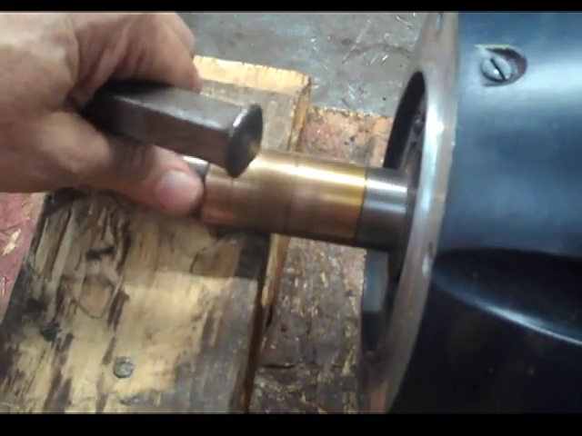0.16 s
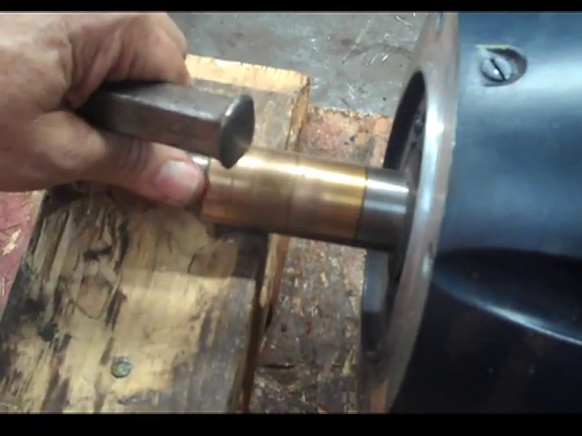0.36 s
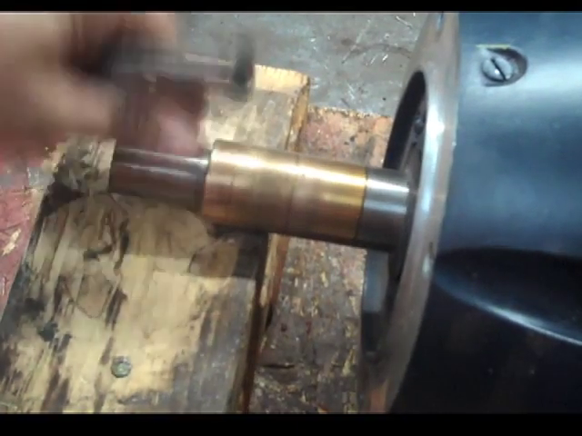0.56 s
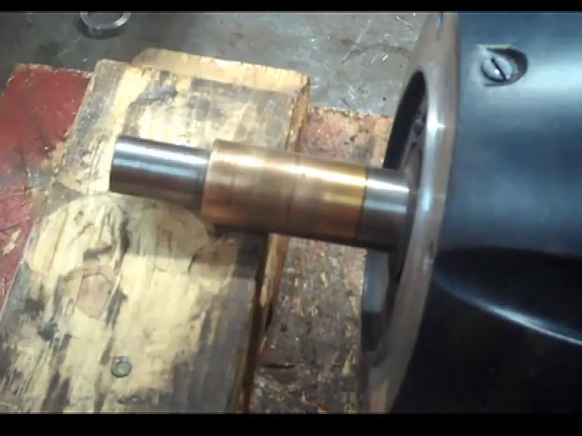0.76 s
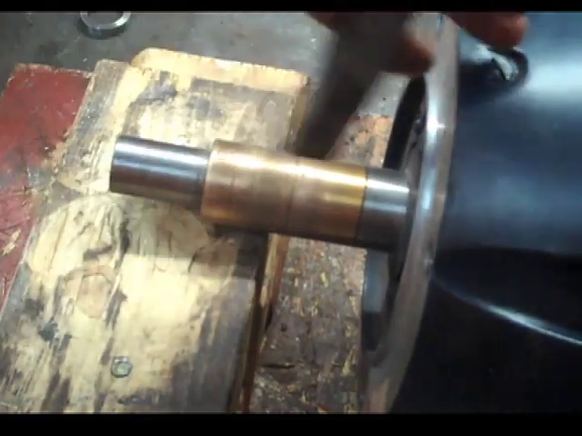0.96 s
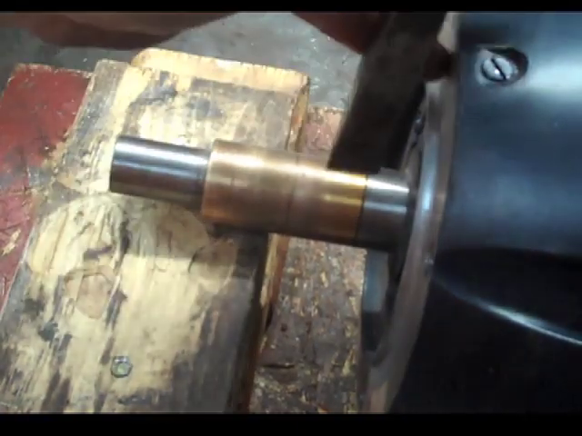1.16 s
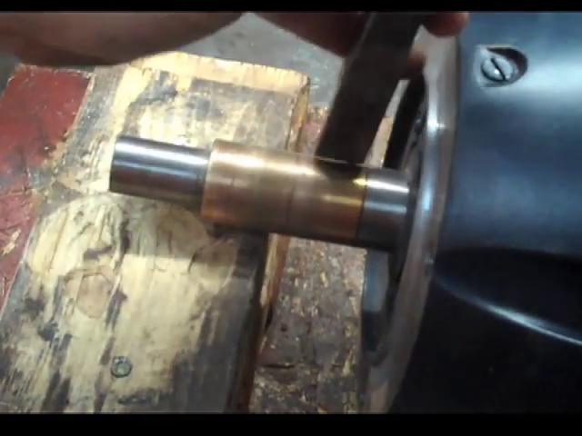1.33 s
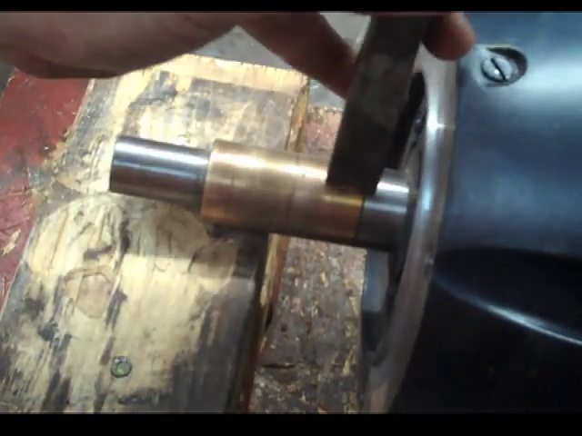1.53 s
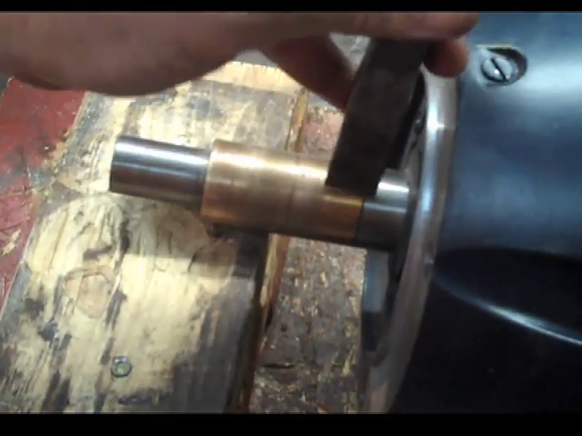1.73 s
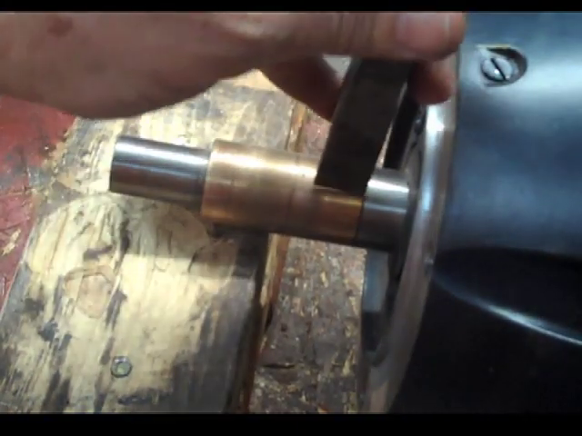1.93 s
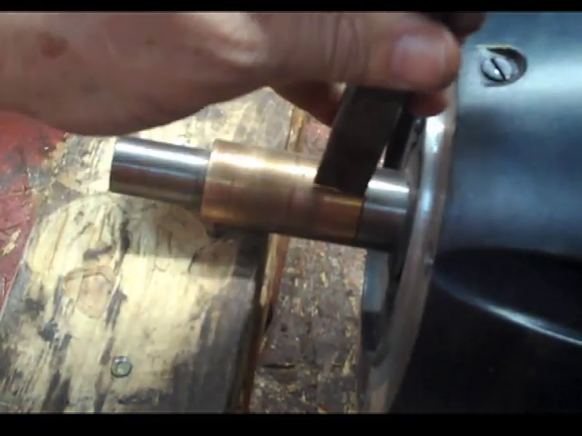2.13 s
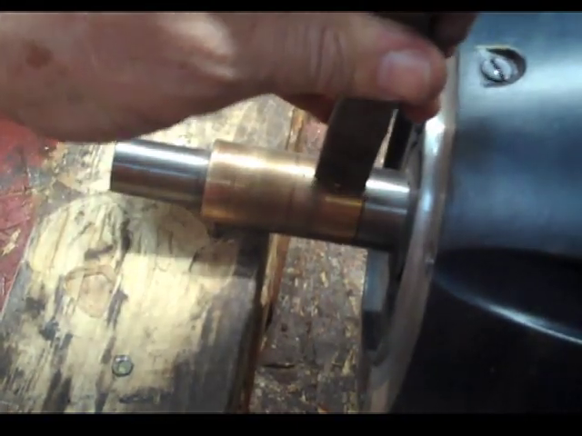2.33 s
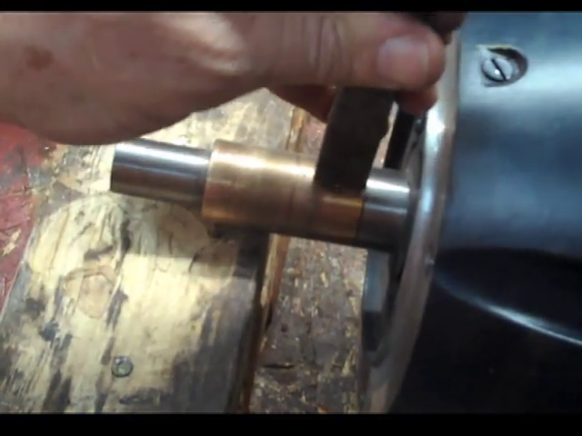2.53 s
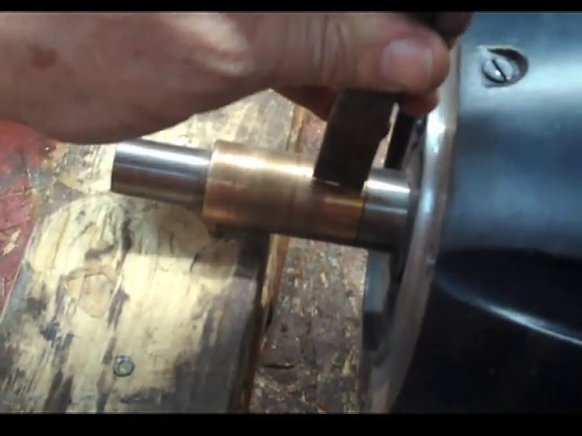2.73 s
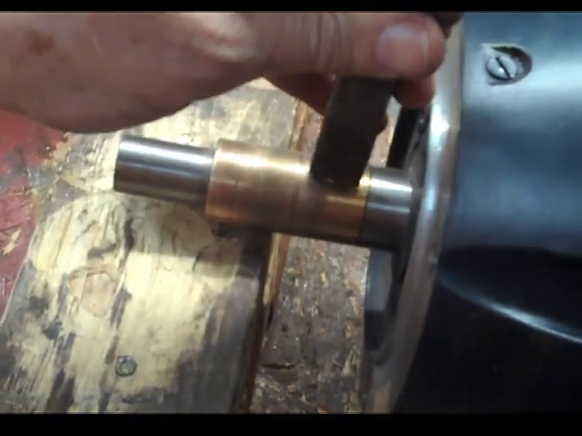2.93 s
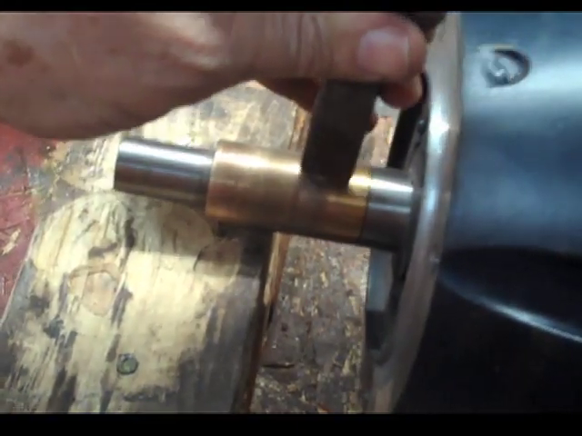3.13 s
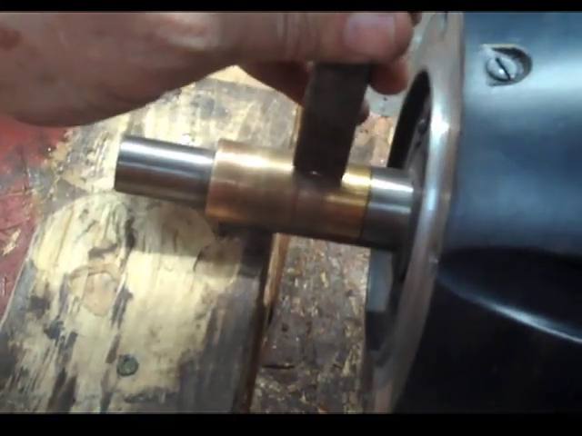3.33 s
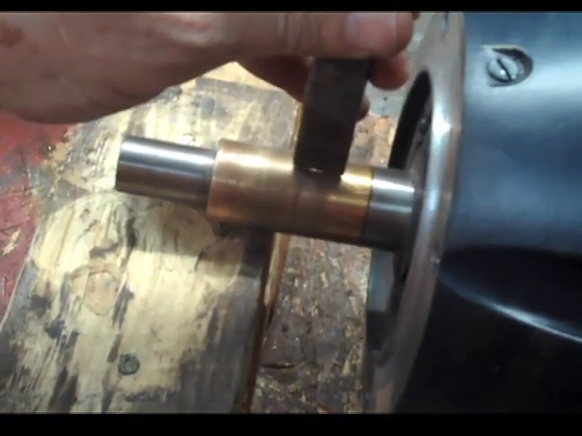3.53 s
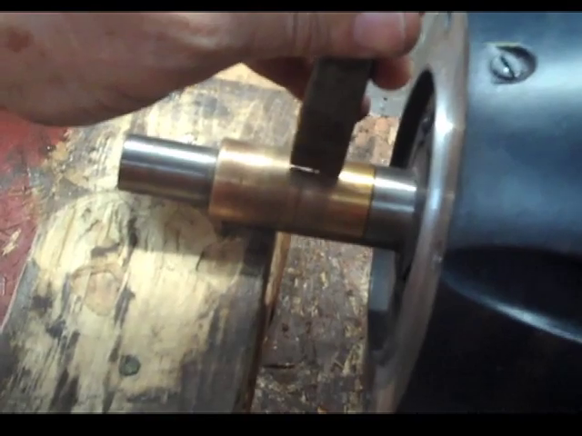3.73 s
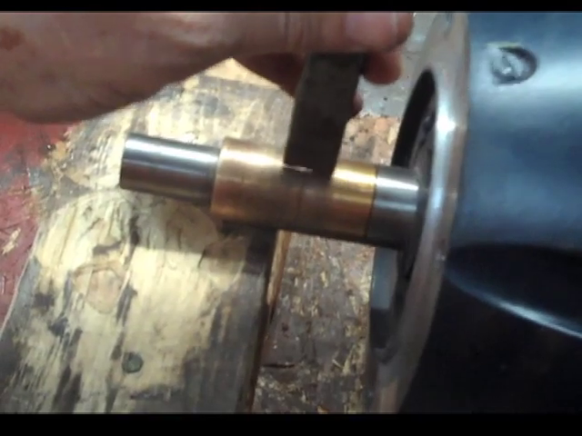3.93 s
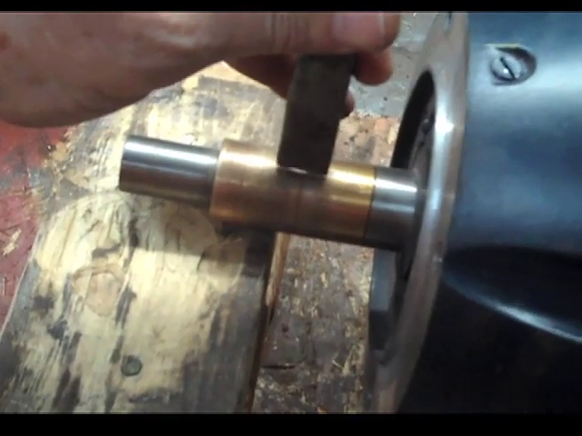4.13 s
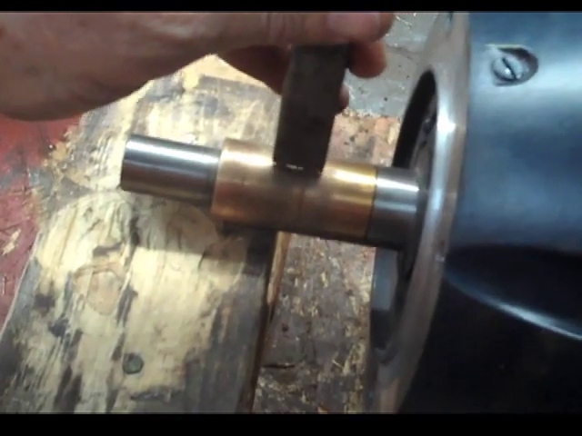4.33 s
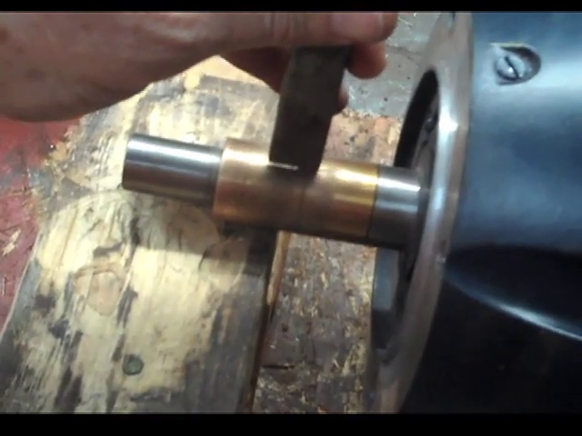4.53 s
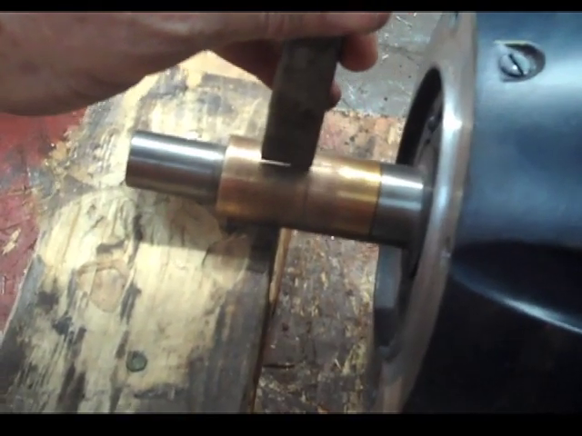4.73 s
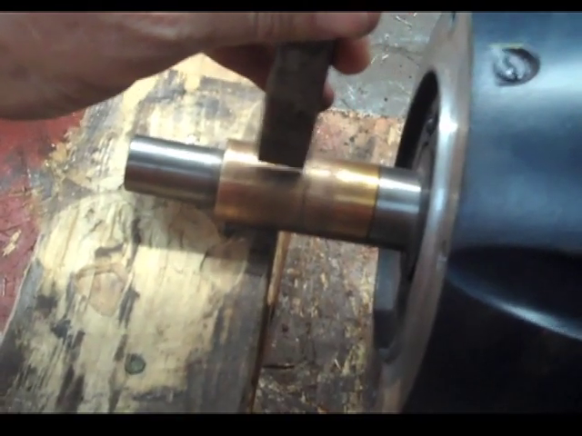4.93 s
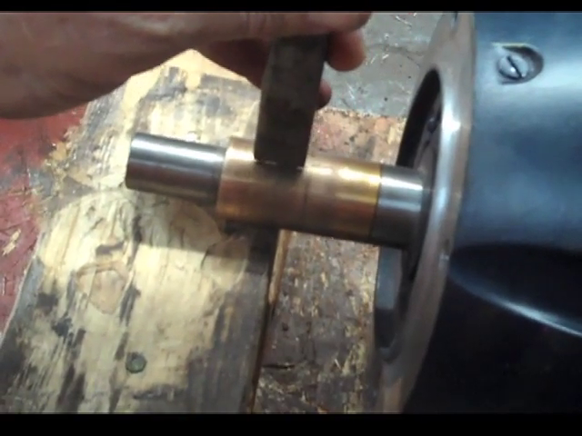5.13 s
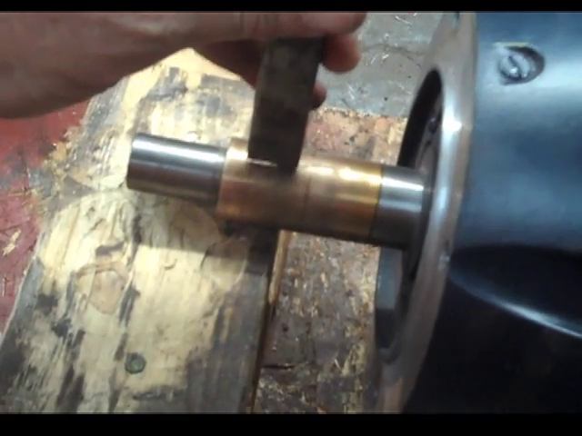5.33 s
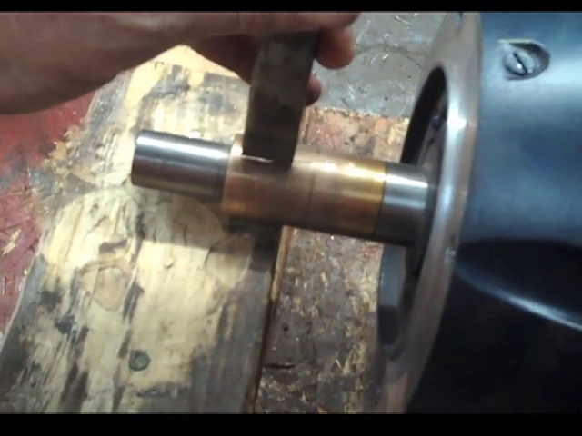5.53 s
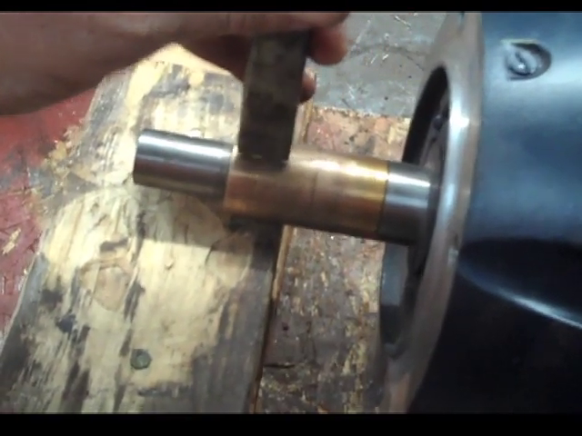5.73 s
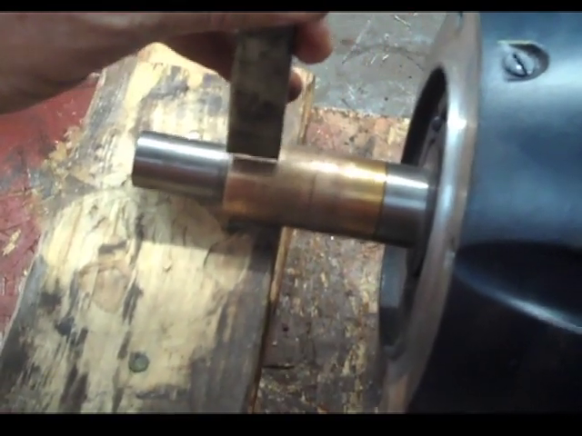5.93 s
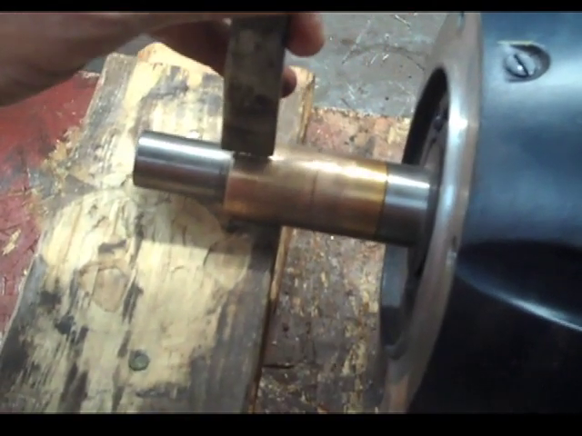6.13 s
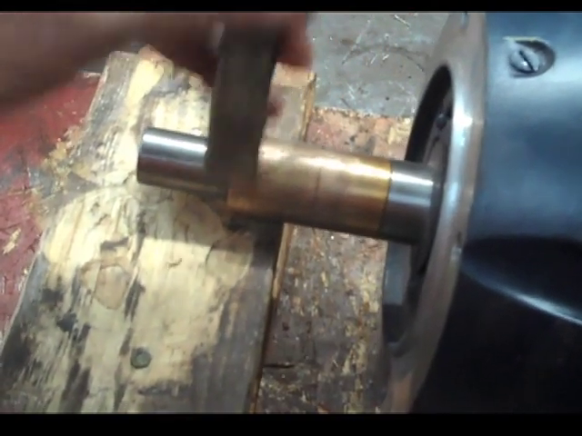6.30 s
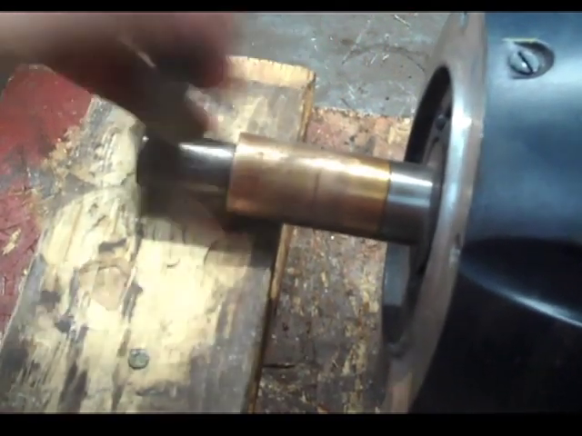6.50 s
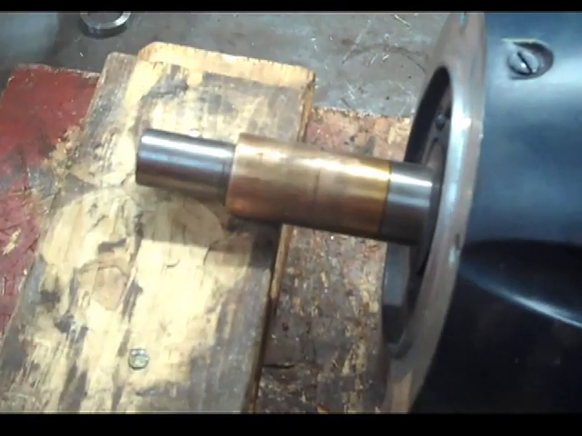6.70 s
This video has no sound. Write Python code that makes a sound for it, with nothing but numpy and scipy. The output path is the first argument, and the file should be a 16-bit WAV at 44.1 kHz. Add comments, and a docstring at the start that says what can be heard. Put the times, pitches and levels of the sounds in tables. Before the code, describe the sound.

Over a low, steady rush of workshop air, fingers brush metal and tiny steel ticks sound. A chisel edge briefly skids and sings, then knocks lightly on a brass sleeve. From two seconds, hard bright clanks follow about four per second, each with crackle, thump and short metallic ringing. The close microphone overloads, while a large hall adds a long wash. A soft lift-off touch ends the run.

```python
"""First come soft brushing and tiny steel ticks over a steady, low rush of air: a hand is placing a chisel.
The chisel skids, touches a brass sleeve on a motor shaft, then is hammered along it about four times a second.
Each blow mixes shaped noise (clash, overload crackle and thump) with fading tones (chisel, edge, housing,
shaft, bench). The housing rings less as the chisel moves away from the motor. A large workshop hall answers
with a long wash of fading noise, and the microphone input flattens the loudest peaks."""
import sys
import numpy as np
from scipy import signal
from scipy.fft import rfft, irfft
from scipy.io import wavfile

SR = 44100
rng = np.random.default_rng(int(sys.argv[2]) if len(sys.argv) > 2 else 0)


def wav_out(sig):
    """Save sig, one row per channel (or a flat mono array), as 16-bit PCM at SR to the path in sys.argv[1]."""
    wavfile.write(sys.argv[1], SR, np.round(np.clip(np.atleast_2d(sig).T, -1, 1) * 32767).astype(np.int16))


N = 302526
AGE = np.arange(SR) / SR  # seconds since a sound began; each single sound is cut off after one second

# Levels are relative unless stated; t60 is the time a sound takes to fade by 60 dB.
# hammer blows: t/s, strength level/dB, chisel ring level/dB, chisel pitch f/Hz
BLOWS = [(2.004, -3.5, -9, 6654), (2.318, 3, -6, 6520), (2.5891, 1.5, -7, 6540), (2.8576, 0.5, -21, 6350),
         (3.1151, -1, -10.5, 6460), (3.3681, -1.5, -11, 6686), (3.637, -.5, -8.5, 6534),
         (3.901, -.5, -6, 6475), (4.156, -1.5, -8, 6570), (4.415, -1.5, -9.5, 6490),
         (4.677, -1.5, -3.5, 6526), (4.9324, -2, -11, 6465), (5.205, -0.5, -24, 6530),
         (5.461, -2.5, -5.5, 6564), (5.7247, -1.5, -11, 6530), (5.9882, -4, -4, 6480),
         (6.2531, -3.5, -7.5, 6510)]
# the chisel is set down, bounces, is lifted off: t/s, clash level/dB, housing level/dB, tilt/(dB per octave)
TOUCHES = [(1.3156, -26, -30, -3.5), (1.5294, -12.5, -10.5, -5), (1.586, -47, -45, -8),
           (1.7365, -52, -32, -15), (6.421, -34, -42.5, -15)]
# the chisel's way along the sleeve: t/s, place (0 motor end, 1 free end)
TRAVEL = [(2.5, 0.023), (3.4, 0.17), (4.4, 0.63), (6.0, 0.71), (6.25, 0.75)]
# housing ring and thump by place: place (0 to 1), housing level/dB relative to the blow, thump level/dB
REACH = [(0, -10.5, -24.5), (.15, -11, -20), (.55, -14, -22), (.73, -17.5, -21.5), (.87, -41, -18)]
# broad colour of the clash: f/Hz, level/dB
CLASH = [(30, -47), (150, -6.5), (420, -4), (750, -1), (2000, -0.5), (3500, 1), (5000, 1.5), (6800, 4),
         (9000, -5.5), (9900, -22), (14000, -72), (17000, -55)]
# resonances of shaft and sleeve: f/Hz, width/Hz, level/dB at motor end, level/dB midway, level/dB at free end
SHAFT = [(852, 270, 11, 6, -8), (1220, 13.4, 17, -2, 3), (1493, 54, 16, 10, 6), (2075, 200, 0, 5, 1.5),
         (4100, 190, 7, 2, -29), (5960, 284, 4.5, 7, 1), (6430, 74, 12, 6.5, 12.5), (8180, 274, 2.5, 13, 4),
         (9120, 71, 5, 14.5, -3)]
# resonance of the chisel edge on the sleeve: t/s, f/Hz, level/dB
EDGE = [(1.3, 2996, 13), (1.55, 2930, 12), (2.0, 2410, 6.5), (2.32, 3310, 7), (3.4, 3290, 7),
        (4.42, 3130, -9), (4.68, 2216, -4), (5.98, 2240, -1.5), (6.25, 2850, 3.5), (6.42, 3005, 28)]
# colour of the bright overload crackle at the start of hard blows: f/Hz, level/dB
CRACKLE = [(500, -48), (3000, -0.5), (9000, 5.5), (14000, 11.5), (16000, -40)]
# chisel tones: ratio to its pitch, level/dB, t60/s
CHISEL = [(0.444, -24, .09), (0.669, -19.5, .05), (.888, -19, .08), (0.941, -42, .05), (0.999, 1.5, 0.025),
          (1.025, -15, 0.049), (1.257, -15.5, 0.049), (1.38, -44, .04), (1.8, -30, 0.045)]
# motor housing tones: ratio to its pitch, level/dB, t60/s
HOUSING = [(.97, 0, 0.09), (1.02, 1, 0.064), (1.091, -11, 0.1), (1.231, -13, 0.097), (1.629, -26.5, 0.36),
           (2.05, -18.5, 0.053), (2.67, -32, 0.045)]
# what rings on in the shaft after a blow: f/Hz, level/dB, t60/s
AFTERRING = [(489, -46, 1.34), (760, -44, 1.9), (916, -43.5, 1.9), (1220, -52.5, 4.6), (1384, -43, 0.96),
             (1518, -51.5, 1.1), (2305, -43, 1), (3230, -33.5, 0.4), (3980, -67, 0.36), (6500, -41, 1),
             (6060, -48.5, 1.34)]
# colour of the overloaded input's dull, low thump: f/Hz, level/dB
THUMP = [(20, -6), (45, 3), (68, 5.5), (110, -1.5), (150, -0.5), (195, 1.5), (260, -5), (420, -5),
         (700, -25), (2000, -30.5)]
# bench tones: f/Hz, level/dB, t60/s
BENCH = [(67.5, -11.5, 1), (168.6, -9, 0.29), (192.9, -12, 0.32)]
# steel ticks against steel in the hand: t/s, level/dB
TICKS = [(.441, -43), (.532, -39.5), (.5895, -37), (.680, -41.5), (0.777, -43)]
# fingers brush the shaft: t/s, level/dB, t60/s
SCUFFS = [(0, -46, 1), (0.535, -50, 0.18), (0.682, -51, 0.35), (0.785, -51, .22), (0.814, -48, 0.25),
          (1.13, -52.5, 0.22), (1.806, -46, 0.31)]
# the chisel edge skids and sings: t/s, level/dB, rise/s, t60/s
SKIDS = [(.94, -52, .015, .2), (1.36, -40.5, 0.03, 0.39), (1.402, -30.5, 0.014, 0.06)]
# tones of a skidding edge: f/Hz, level/dB
SQUEAL = [(2930, -11), (6560, 2), (6690, -13), (8270, -21), (11850, -17)]
# close sound, left minus right: f/Hz, level/dB
EARS = [(40, 2.5), (150, -3), (700, -2), (1500, -5), (4000, -0.5), (6400, -3), (8000, 8.5), (13000, 6.5)]
# the hall's echoes: f/Hz, level/dB, t60/s
HALL = [(60, -26.5, 3.3), (203, -22, 2.5), (560, -28, 4.7), (980, -25.5, 5.9), (2880, -23, 4.85),
        (5000, -25.5, 2.93), (8100, -21, 1.82), (11700, -16.5, 0.86)]
# colour of the steady air: f/Hz, level/dB
AIR = [(25, -13), (100, -5.5), (170, -0.5), (450, -7), (830, -0.5), (1400, -8.5), (2500, -20.5),
       (5000, -27), (8000, -23), (10000, -31.5), (14000, -33)]
# pairs (loose chisel, seated chisel): housing pitch f/Hz, clash t60/s, coupling level/dB into the shaft
HOUSING_HZ = (811.4, 755)
CLASH_T60_S = (0.036, 0.071)
COUPLING_DB = (-6, -1)
# pairs (touch, hammer blow): width/Hz of the edge resonance, level/dB sent into the hall
EDGE_WIDTH_HZ = (180, 560)
HALL_DB = (-5, -3.5)

SEATED_S = 2.15  # the first blow seats the chisel; contacts after this time press firmly
LOOSE_LOW_CUT_HZ = 670  # a loose chisel's clash thins out below this
TOUCH_CHISEL_DB, TOUCH_CHISEL_HZ = -6, 6440  # chisel ring of a touch, level relative to its clash
LOOSE_THUMP_DB, TOUCH_THUMP_DB = -14, -45  # change for a loose chisel; a touch's thump relative to its clash
BRIGHT_DB_PER_OCT, DULLING_DB_PER_OCT = 1.5, 3  # tilt at the motor end; what it loses by the free end
LEAD_S = 0.0005  # close sound starts this much before the sound sent to the hall
TICK_HZ, TICK_RISE_S, TICK_T60_S = 6100, 0.0012, 0.014
SCUFF_HZ, SCUFF_RISE_SHARE = 5680, 0.029  # rise as a share of the scuff's t60
ALIKE_HZ = 2050  # hall and air are alike on both sides well below this
AIR_DB = -46.5
TOP_HZ = 15500


def blows():
    """Touches and hammer blows; towards the free end the blows grow duller and ring the housing less."""
    near, sent = np.zeros((2, 2, N))
    for s, db, housing_db, tilt_db in TOUCHES:
        chisel_db, thump_db = db + TOUCH_CHISEL_DB, db + TOUCH_THUMP_DB
        close, far = contact(s, db, housing_db, chisel_db, TOUCH_CHISEL_HZ, thump_db, tilt_db, EDGE_WIDTH_HZ[0])
        add(near, s - LEAD_S, close)
        add(sent, s, undb(HALL_DB[0]) * far)
    for s, db, chisel_db, chisel_hz in BLOWS:
        place, = follow(TRAVEL, s)
        reach_db, thump_db = follow(REACH, place)
        tilt_db = BRIGHT_DB_PER_OCT - DULLING_DB_PER_OCT * place
        close, far = contact(s, db, db + reach_db, chisel_db, chisel_hz, thump_db, tilt_db, EDGE_WIDTH_HZ[1])
        add(near, s - LEAD_S, close)
        add(sent, s, undb(HALL_DB[1]) * far)
    return near, sent


def contact(s, clash_db, housing_db, chisel_db, chisel_hz, thump_db, tilt_db, edge_width):
    """One hit sets every part sounding at once; returns the close sound and what is sent into the hall."""
    seated = int(s > SEATED_S)
    t60, coupling_db = CLASH_T60_S[seated], COUPLING_DB[seated]
    force = undb(clash_db + 2)
    clash = force * fade(t60, rise=0.001) * steel(s, coupling_db, edge_width, tilt_db, dense_db=-1.5)
    chisel = chisel_ring(chisel_db, chisel_hz)
    edge = force * edge_ring(s)
    housing = housing_ring(housing_db, HOUSING_HZ[seated])
    low = undb(thump_db + (0 if seated else LOOSE_THUMP_DB)) * (overload_thump() + bench_ring())
    near = clash + overload_crackle(clash_db) + chisel + edge + housing + low + afterring(clash_db + coupling_db)
    # mostly the strong resonances carry into the hall, so the dense bed is weaker here
    radiated = force * fade(t60, rise=0.00099) * steel(s, coupling_db, edge_width, tilt_db, dense_db=-3.0)
    far = radiated + undb(-31) * edge + undb(-11) * chisel + undb(-5.0) * housing + low
    return near, far


def steel(s, coupling_db, edge_width, tilt_db, dense_db):
    """Clash noise: dense steel tones under shaft and edge resonances, whose strengths vary at each hit."""
    place, = follow(TRAVEL, s)
    edge_hz, edge_db = follow(EDGE, s)
    peaks = [(edge_hz, edge_width, edge_db)]
    for hz, width, *dbs in SHAFT:
        db = np.interp(place, [0, .5, 1], dbs) + coupling_db + 2 * rng.standard_normal()
        peaks.append((hz, width, db))

    def colour(f):
        """Resonances on a broad, tilted bed."""
        power = undb(dense_db) ** 2
        for hz, width, db in peaks:
            power = power + undb(db) ** 2 / (1 + (2 * (f - hz) / width) ** 2)
        weight = 1 if s > SEATED_S else f ** 2 / np.hypot(f ** 2, LOOSE_LOW_CUT_HZ ** 2)
        tilt = undb(tilt_db * np.log2(np.maximum(f, 800) / 3000))
        return weight * np.sqrt(power) * curve(CLASH, f) * tilt
    return noise(colour, alike_hz=7700, size=SR, shared=0.76)


def overload_crackle(clash_db):
    """Bright, splashy overload crackle at the start of hard blows, made as a noise burst of about 10 ms."""
    burst = np.exp(-(AGE / 0.01) ** 4)
    # 1.77 dB for each dB of the clash: light contacts lose their crackle faster than their clash
    return undb(1.77 * clash_db - 8.5) * burst * noise(lambda f: curve(CRACKLE, f), alike_hz=13900, size=SR)


def chisel_ring(db, pitch_hz):
    """The struck chisel vibrates in several quickly fading tones."""
    modes = [(ratio * pitch_hz, mode_db, t60) for ratio, mode_db, t60 in CHISEL]
    return undb(db + 8.5) * ring(modes, rise=0.0053, detune=0.00057, spread=0.13)


def edge_ring(s):
    """The edge sings on the sleeve in two tones; a loosely held chisel rings freely here."""
    edge_hz, edge_db = follow(EDGE, s)
    modes = [(edge_hz, 0, .07), (1.2 * edge_hz, -8, .05)]
    return undb(edge_db - 21.5) * ring(modes, rise=0.00084, detune=0.0032, spread=0.63)


def housing_ring(db, pitch_hz):
    """The heavy motor housing takes a few milliseconds to get going, then rings."""
    modes = [(ratio * pitch_hz, mode_db, t60) for ratio, mode_db, t60 in HOUSING]
    return undb(db + 3) * ring(modes, rise=0.0054, detune=0.003, spread=0.12)


def afterring(db):
    """Long tones left in the shaft; they pass through it, so they need firm coupling."""
    return undb(db + 1.0) * ring(AFTERRING, rise=0.00844, detune=0.00184, spread=0.13)


def overload_thump():
    """Dull, low thump of the overloaded input: fading noise, nearly unrelated on the two sides."""
    thud = undb(11.5) * fade(t60=0.078, rise=0.0037)
    body = noise(lambda f: curve(THUMP, f), alike_hz=900, size=SR, shared=.1)
    sides = undb([[2], [-2]])  # left, right
    return sides * thud * body


def bench_ring():
    """The bench rings in a few low fading tones."""
    return ring(BENCH, rise=0.0098, detune=0.0032, spread=0.22)


def handling():
    """Ticks and hand scuffs are friction noise; short squeals of the edge are fading tones."""
    out = np.zeros((2, N))
    for s, db in TICKS:
        add(out, s, undb(db) * hiss(TICK_HZ) * fade(TICK_T60_S, TICK_RISE_S))
    for s, db, t60 in SCUFFS:
        add(out, s, undb(db) * hiss(SCUFF_HZ) * fade(t60, SCUFF_RISE_SHARE * t60))
    for s, db, rise, t60 in SKIDS:
        tones = [(hz, tone_db, t60) for hz, tone_db in SQUEAL]
        add(out, s, undb(db) * ring(tones, rise, detune=0.00078, spread=0.25))
    return out


def hiss(hz):
    """Broad friction noise that peaks at hz."""
    points = [(hz / 6, -12), (hz / 2, -4), (hz, 0), (1.41 * hz, -2), (1.67 * hz, -13), (3 * hz, -24)]
    return noise(lambda f: curve(points, f), alike_hz=4000, size=SR)


def ports(x, lag_s):
    """Close sound reaches the left microphone port a little later and in a different colour."""
    f = np.fft.rfftfreq(N, 1 / SR)
    tilt = np.sqrt(curve(EARS, f))  # half of the difference on each side
    left = tilt * np.exp(-2j * np.pi * f * lag_s)
    return irfft(rfft(x) * np.array([left, 1 / tilt]), N)


def hall(x):
    """Many mixed echoes, made as noise bands that fade at their own speeds; the high treble dies first."""
    size = 3 * SR  # the wash is cut off after 3 s
    t, f = np.arange(size) / SR, np.fft.rfftfreq(size, 1 / SR)
    echoes = rfft(noise(np.ones_like, alike_hz=ALIKE_HZ, size=size, shared=1.0))
    centres, response = np.log(np.array(HALL)[:, 0]), 0
    # each row of the identity matrix picks one band, which overlaps its neighbours
    for share, (_, db, t60) in zip(np.eye(len(HALL)), HALL):
        band = irfft(echoes * np.interp(np.log(f + 1), centres, share), size)
        response = response + undb(db) * band * np.exp(-np.log(1000) * t / t60)
    # the nearest walls and the bench answer first and strongest
    response = response * (1 + 5.5 * np.exp(-t / 0.023)) * np.minimum(t / 0.024, 1)
    mono = x.mean(axis=0, keepdims=True)
    return undb(-27.5) * signal.fftconvolve(mono, response, axes=1)[:, :N]


def air():
    """Steady low rush of the workshop, made of shaped noise."""
    return undb(AIR_DB) * noise(lambda f: curve(AIR, f), alike_hz=ALIKE_HZ, size=N, shared=0.99)


def ring(modes, rise, detune, spread):
    """Fading tones, weighted and tuned anew each time; each reaches the two sides in its own phase."""
    out = 0
    for hz, db, t60 in modes:
        size, tune, apart = rng.standard_normal(3)
        phase = 2 * np.pi * (hz * (1 + detune * tune) * AGE + rng.random())
        sides = spread * apart * np.array([[1], [-1]])
        out = out + undb(db + 2 * size) * fade(t60, rise) * np.sin(phase + sides)
    return out


def noise(gain, alike_hz, size, shared=1):
    """Stereo noise of rms 1 with the spectrum gain(f); the sides share a part and drift apart with pitch."""
    f = np.fft.rfftfreq(size, 1 / SR)
    mid, side = rfft(rng.standard_normal((2, size)))
    alike = np.clip(shared, 0, 1) / (1 + (f / alike_hz) ** 2)  # halved at alike_hz
    both = mid * np.sqrt(1 + alike) + np.outer([1, -1], side) * np.sqrt(1 - alike)
    x = irfft(gain(f) * both, size)
    return x / x.std()


def fade(t60, rise):
    """A straight rise, then an exponential decay by 60 dB in t60 seconds (at least 5 ms)."""
    decay = np.exp(-np.log(1000) * np.maximum(AGE - rise, 0) / max(t60, .005))
    return np.minimum(AGE / rise, 1) * decay


def curve(points, f):
    """Gain at the frequencies f, read from rows of f/Hz, level/dB."""
    hz, db = np.transpose(points)[:2]
    return undb(np.interp(np.log(f + 1), np.log(hz), db))


def follow(rows, at):
    """Read the other columns of a table where its first column equals at."""
    first, *columns = np.transpose(rows)
    return [np.interp(at, first, c) for c in columns]


def undb(db):
    """Decibels to gain."""
    return 10 ** (np.asarray(db) / 20)


def add(out, s, sound):
    """Mix a sound in at time s."""
    i = max(int(s * SR), 0)
    out[:, i:i + sound.shape[-1]] += sound[..., :N - i]


def scene():
    """Close blows and handling, the hall's answer and the air."""
    near, sent = blows()
    small = handling()
    return ports(near + small, lag_s=.00003) + hall(sent + undb(-20) * small) + air()


def record(dry):
    """The input overloads and flattens loud peaks towards 0.98; two filters then cut the top."""
    clipped = dry / (1 + np.abs(dry / .98) ** 8) ** (1 / 8)
    softened = signal.sosfilt(signal.butter(2, 14000, fs=SR, output="sos"), clipped)
    return signal.sosfilt(signal.ellip(8, .2, 70, TOP_HZ, fs=SR, output="sos"), softened)


dry = scene()
out = record(dry)
wav_out(out)
```